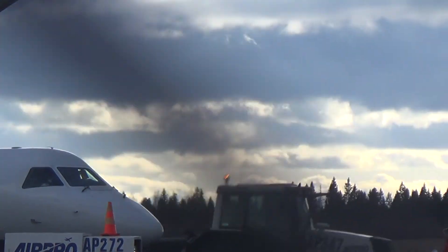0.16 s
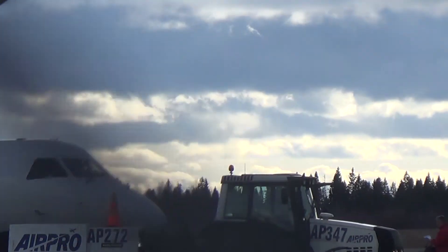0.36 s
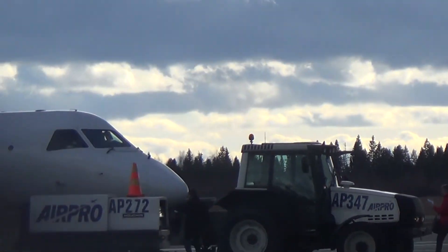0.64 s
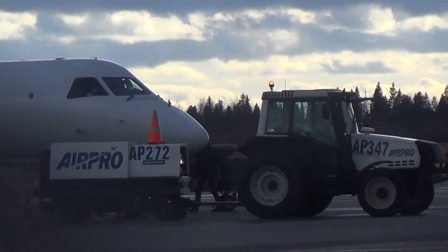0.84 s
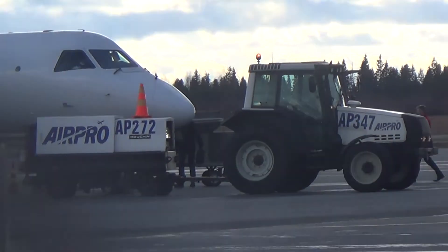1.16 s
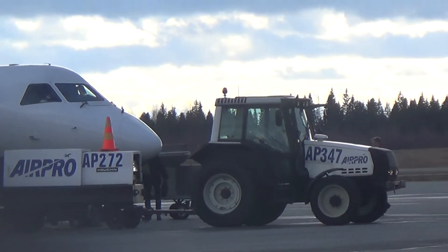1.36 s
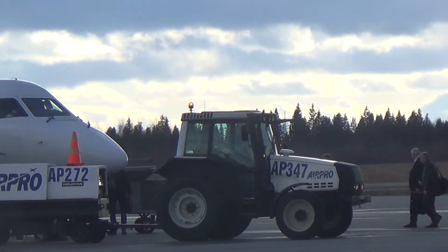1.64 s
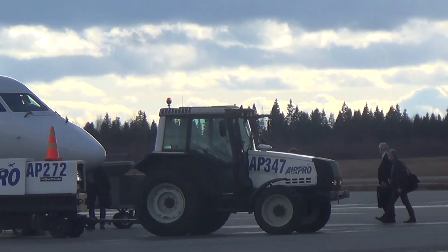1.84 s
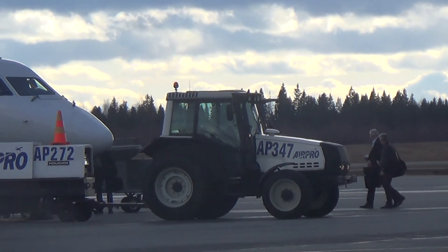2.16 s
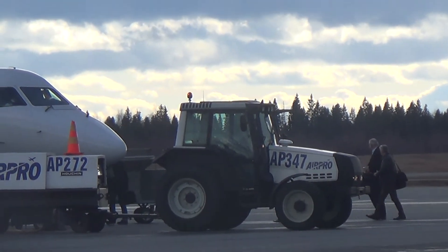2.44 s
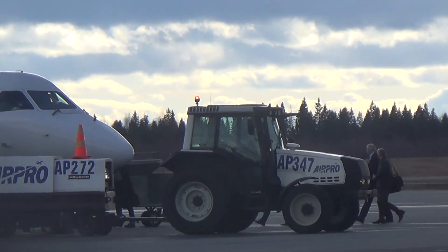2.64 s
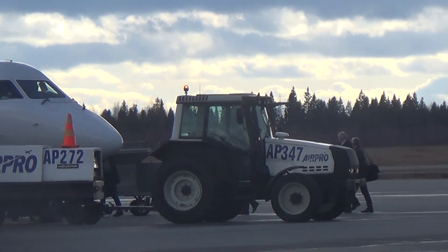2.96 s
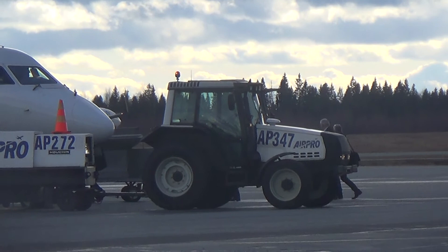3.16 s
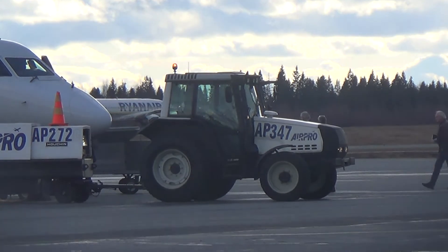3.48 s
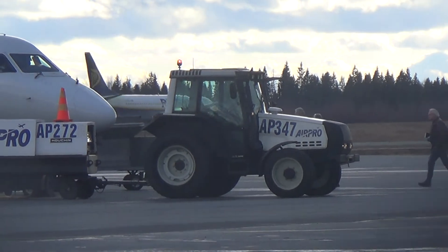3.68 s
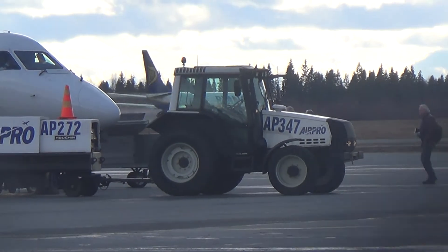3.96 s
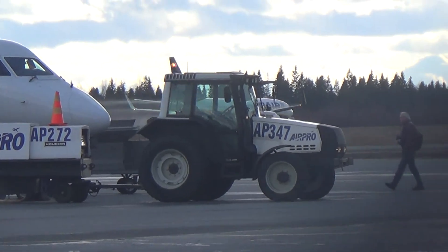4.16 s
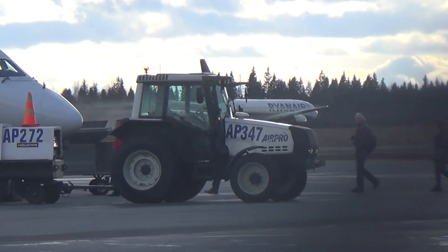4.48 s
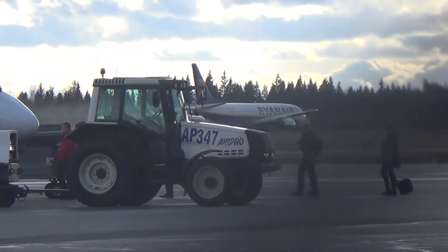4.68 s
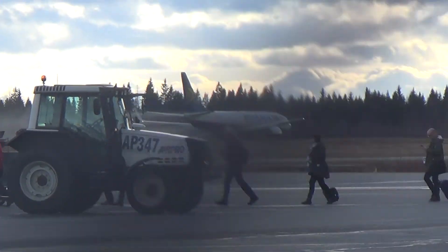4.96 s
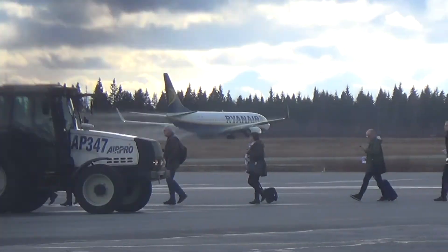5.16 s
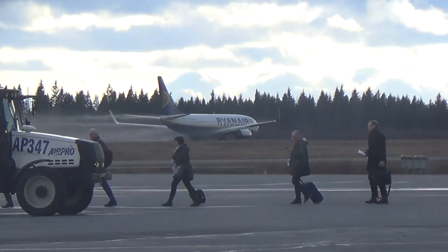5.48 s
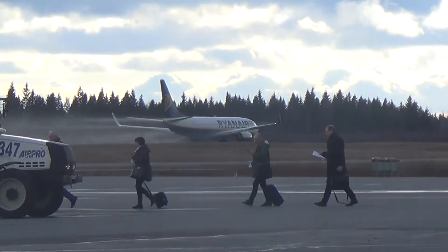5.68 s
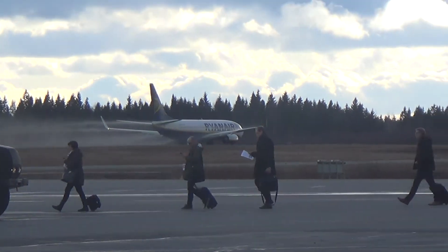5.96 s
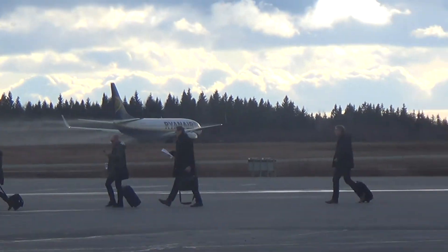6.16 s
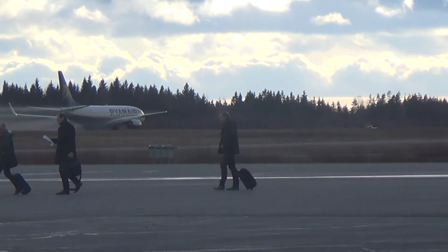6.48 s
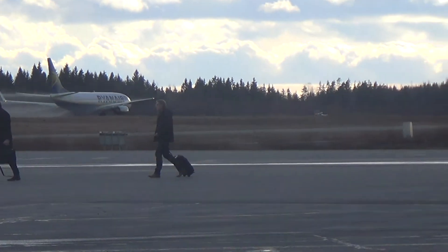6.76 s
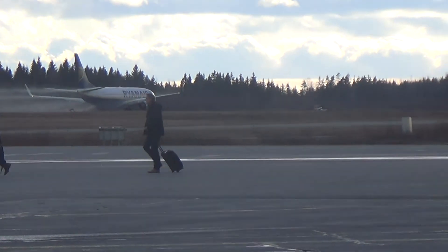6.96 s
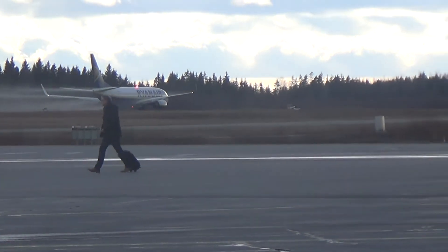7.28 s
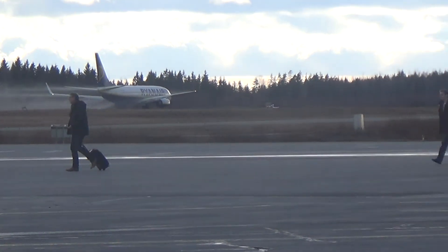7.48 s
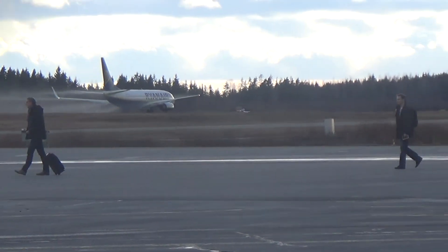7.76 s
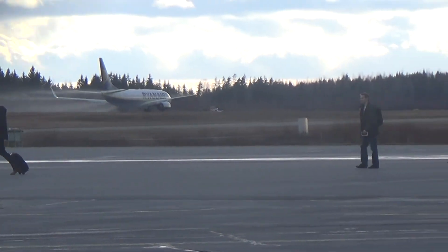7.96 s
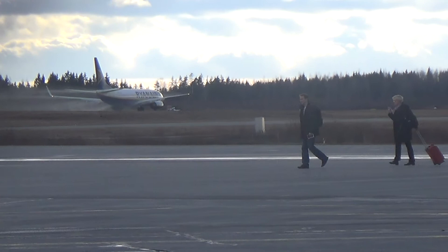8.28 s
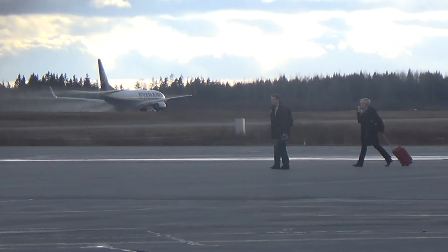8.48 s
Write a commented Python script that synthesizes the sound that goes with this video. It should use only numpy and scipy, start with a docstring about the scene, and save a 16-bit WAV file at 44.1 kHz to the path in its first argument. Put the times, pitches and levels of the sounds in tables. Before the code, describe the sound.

Outdoors on a windy airport apron, heard through a handheld camera's stereo microphone. From 0 s, strong low wind buffeting, slightly heavier on the right, covers a steady, mid-heavy distant jet roar with thin, wavering turbine whines. Small clicks fall at 0.4 and 0.7 s; faint airy high notes pass around 0.7 and 1.0 s, and another swells near 2.3 s. Short fluttering gust thumps strike around 0.5 to 1.3 s and 2.6 s, then cluster from 4.3 to 6 s. Deep exhaust rumble grows by 4.2 s. Plastic ticks come at 4.1, 4.7 and 5.1 s, the loudest a sharp snap at 5.3 s. Low wind pops bump at 5.7 to 6.4 s. From about 6.9 s the wind eases, exposing the roar and rumble, with faint rustles, light ticks at 7.3 to 7.6 and 8.3 s, soft hiss and a very high faint electronic whistle until the end at 8.6 s.

```python
"""Windy airport apron

A jet far down the runway and turbines nearer by, taken with a hand-held camera's two-port microphone.
Roar, rumble and rush are shaped noise, the roar arriving both directly and off the concrete; whines
are drifting tones blurred by noise, and the airy high notes are narrow bands of noise.
Wind buffets the whole microphone, and eddies, puffs and pops differ between its ports.
The camera ticks as ringing shell modes, rustles as grainy noise, and adds its own hiss and whistle."""
import sys
import numpy as np
from scipy import signal
from scipy.fft import rfft, irfft, next_fast_len
from scipy.io import wavfile
from scipy.ndimage import uniform_filter1d

SR = 44100
rng = np.random.default_rng(int(sys.argv[2]) if len(sys.argv) > 2 else 0)


def file_out(sig):
    """Save sig as 16-bit WAV at sys.argv[1]."""
    # one column per channel
    cols = np.atleast_2d(sig).T
    # limit, then scale
    lim = np.clip(cols, -1, 1)
    pcm = np.round(lim * 32767).astype(np.int16)
    wavfile.write(sys.argv[1], SR, pcm)


N = 380141
TIME = np.arange(N) / SR

# Every *_SPECTRUM table gives relative density: f/Hz, level/dB per Hz

# wind pressure on the whole microphone: t/s, level/dB, upper rumble relative to it/dB
BUFFET_CURVE = [(0, -14, -2), (.2, -14.5, 2.5), (.55, -15.5, -3), (.88, -15, -6), (1.25, -17, -6.5),
                (1.45, -17.5, -0.5), (1.7, -17, -1.5), (1.87, -17, 1), (2.1, -19, -15), (2.65, -15, -16),
                (3.2, -17, -11.5), (3.7, -15, -6.5), (4.2, -17, -5.5), (4.52, -15.5, -11.5),
                (4.85, -17.5, -5.5), (5.3, -18, -8), (5.7, -18.5, -10.5), (6.1, -21, -15), (6.3, -20, -9),
                (6.7, -22, -4), (6.95, -27, -7.5), (7.5, -28.5, 0), (8.1, -25.5, -7), (8.62, -27, -10)]
BUFFET_SPECTRUM = [(10, -41), (25, -28), (42, -21), (65, -3.5), (88, 0.6), (125, -3.5), (175, -8.5),
                   (235, -16.5), (310, -32.5), (450, -48.5), (1000, -44), (3000, -110)]
# brief lulls in the wind: centre t/s, length/s, depth/dB
WIND_LULLS = [(1.982, 0.057, 6), (4.68, 0.051, 8), (5.033, .04, 0), (5.483, 0.055, 7.5), (5.69, 0.046, 4.5),
              (6.846, 0.051, 1.5), (7.48, .04, 1)]
# turbulence at the ports, before an overall trim: t/s, level/dB
EDDY_CURVE = [(0, -27), (.75, -28), (1.15, -20.5), (1.95, -28), (2.65, -22), (3.1, -23.5), (4.1, -30),
              (4.35, -21.5), (4.7, -27), (5.25, -18.5), (5.65, -23.5), (5.95, -26), (6.65, -26.5),
              (7.15, -36.5), (7.8, -29.5), (8.62, -36)]
# the same turbulence in a moderate gust
EDDY_SPECTRUM = [(15, -31), (50, -19), (100, -3.5), (160, 1), (230, -2.5), (320, -18.5), (450, -20.5),
                 (700, -41), (1500, -60), (4000, -101)]
# engine roar, before an overall trim: t/s, level/dB, treble relative to it/dB, middle relative to it/dB
ROAR_CURVE = [(0, -32.5, -18, -1), (.45, -33, -18, -0.18), (1.4, -32, -19, .5), (2.45, -31.5, -17, 1.3),
              (3.2, -31, -19.5, .3), (3.8, -30, -22.5, -0.44), (4.3, -32, -20.5, -0.55),
              (4.9, -33, -20.5, -0.12), (5.6, -34, -23, -0.23), (6.3, -32, -24, -1.7),
              (7.3, -32.5, -21, -1.1), (7.85, -31.5, -19.5, -0.89), (8.62, -32, -20, 0.43)]
ROAR_SPECTRUM = [(30, -12.5), (150, 6.5), (320, 2.5), (420, -2.5), (520, -1.5), (610, 0.7), (850, -1.1),
                 (1020, -4.5), (1480, -4.5), (1760, -8.5), (2000, -10.5), (2350, -15), (2780, -14.5),
                 (3100, -20.5), (3800, -25), (4300, -30.5), (6500, -43), (15000, -93)]
# how the scattered roar differs from the jet's own spectrum: f/Hz, level/dB
SCATTER_TINT = [(300, -2.0), (650, -3.5), (1100, -0.5), (2800, -4.5), (6000, -0.5), (9000, -6), (12000, -22)]
# deep exhaust noise, stronger as the jet turns its tail this way: t/s, level/dB
RUMBLE_CURVE = [(0, -43), (1, -35), (2.5, -39), (4.2, -24), (5.5, -32.5), (6.85, -29.5), (7.5, -29),
                (7.95, -27.5), (8.62, -29.5)]
RUMBLE_SPECTRUM = [(10, -32), (24, 3), (40, 10), (62, 9.5), (85, 3.5), (140, -14), (400, -55), (1500, -110)]
# thin rush of air through the turbines: t/s, level/dB
RUSH_CURVE = [(0, -58), (.25, -66), (.6, -60.5), (1.1, -60.5), (1.7, -64), (2.2, -59), (2.7, -59.5),
              (3.3, -64), (4.4, -66), (5.6, -70), (6.5, -63.5), (7.5, -65), (8.62, -62)]
RUSH_SPECTRUM = [(2500, -5), (4200, -.5), (5300, 1.5), (6300, -2), (8000, -0.5), (10000, -2.5),
                 (11500, -8.5), (15000, -23)]
# steady turbine and fan tones: f/Hz, level at the start/dB, blur/Hz, fading/dB per s
BLADE_TONES = [(319.7, -56.5, 8, -1), (566, -60, 50, -2), (598.3, -51, 14, -0.94), (1120, -57, 18, -0.5),
               (1232, -59, 8, -0.3), (1373, -53, 9, 0.5), (1519, -65, 4.4, 2.5), (3520, -66.5, 11, 0.6),
               (3920, -71, 39, 0), (5594, -77.5, 16, 0)]
# two tones that come and go on the wind: t/s, f/Hz, level/dB
FAN_WHINE_CURVE = [(0, 2756, -63), (.5, 2770, -66), (1.0, 2750, -58), (1.7, 2780, -59), (2.5, 2740, -59),
                   (3.4, 2738, -60), (4.5, 2766, -55), (5.6, 2760, -64), (6.5, 2756, -61),
                   (8.62, 2780, -61)]
BRIEF_WHINE_CURVE = [(0, 3472, -63), (.2, 3460, -58), (.38, 3480, -65), (1.2, 3465, -68), (2.6, 3465, -75),
                     (4, 3465, -88)]
# airy turbine notes, two short high ones, the second lower, and one swelling: t/s, f/Hz, level/dB
HIGH_NOTES_CURVE = [(0, 10400, -89), (.45, 10350, -79), (.68, 10280, -71), (.86, 10100, -80),
                    (.93, 8900, -84), (1.04, 8680, -71), (1.25, 8550, -80), (1.8, 8300, -100)]
SWELLING_CURVE = [(0, 5200, -84), (1.6, 5200, -75), (2.3, 5250, -65), (2.7, 5250, -69.5), (3.4, 5230, -75),
                  (5, 5100, -95)]
# the camera's own noise: t/s, hiss level/dB, whistle level before a trim/dB
CAMERA_NOISE = [(0, -64, -77), (1.2, -61.5, -76), (2.2, -61, -73), (4, -60.5, -74), (5.6, -61.5, -73),
                (6.8, -59.5, -71), (8.62, -60, -70.5)]
HISS_SPECTRUM = [(1000, -3.5), (6000, 2), (9800, 1), (12000, -1.5), (13500, -1.5), (15700, -3)]
# ticks of the camera body: t/s, peak of the shell's ring/dB, tilt/dB per octave, f of the spot pressed/Hz
BODY_TICKS = [(0.397, -38, -1, 4800), (.6674, -41, 0, 10500), (4.067, -36, -8, 4750),
              (4.6868, -32, -11, 3900), (5.103, -39, 12, 8700), (5.105, -26, 13, 4560),
              (5.3331, -15, -2, 2560), (5.4053, -30.5, 6, 4750), (7.3108, -37, -4, 5050),
              (7.525, -43, 12, 10000), (7.5674, -37, -14, 2500), (8.3126, -38, 10, 11500)]
# modes of the small plastic shell, before a tick's tilt: f/Hz, level/dB, t60/s
SHELL_MODES = [(2100, -3, 0.012), (2720, -2, 0.014), (3380, 1.5, 0.015), (4650, 0, 0.011), (5330, -7, .008),
               (5910, -1.5, .013), (6300, -14, 0.025), (7400, -10, 0.013), (8700, -6, 0.014),
               (9180, -4, 0.012), (10300, -7, 0.007), (11400, -7, .008), (12900, -12, .007)]
# gusts that strike the case: start t/s, length/s, level/dB, centre f/Hz, part common to both ports/dB
CASE_PUFFS = [(0.505, 0.04, -23, 240, -10), (0.954, 0.089, -27.5, 230, -12), (1.125, 0.064, -35, 269, -4),
              (1.256, 0.04, -19, 262, -10), (2.584, 0.042, -20, 278, -11), (4.299, 0.12, -21, 220, -11),
              (4.539, 0.054, -16, 220, -13), (4.796, 0.035, -15, 200, -11), (5.056, 0.092, -20, 271, -2),
              (5.22, 0.097, -21, 215, -2.5), (5.335, 0.064, -22.5, 240, -4), (5.412, 0.069, -19, 205, 1),
              (5.495, 0.093, -25.5, 235, -2), (5.782, 0.05, -25.5, 230, -6),
              (5.873, 0.11, -21.5, 280, -3.5), (5.995, 0.0325, -24, 288, -4), (7.335, .04, -32, 200, -12),
              (8.154, .04, -31, 200, -8)]
# fingers shifting on the shell: centre t/s, length/s, level/dB
FINGER_RUBS = [(3.40, .025, -57), (6.47, .025, -60), (7.427, .015, -60), (7.497, 0.046, -56),
               (7.66, .028, -57), (8.0, 0.09, -60), (8.13, .028, -54), (8.533, .012, -49.5),
               (8.555, .012, -57)]
RUB_SPECTRUM = [(1500, -30), (5000, 0), (8000, -4), (10300, -2), (12500, -7), (15000, -20)]
# single whirls between the ports: centre t/s, peak of the opposed part/dB
WHIRL_POPS = [(5.722, -19), (5.779, -12), (6.179, -15), (6.25, -17), (6.351, -8.5)]


def gain_of(db):
    """Decibels to amplitude."""
    return 10 ** (np.asarray(db) / 20)


def evened(x):
    """Scales to rms 1."""
    return x / np.sqrt(np.mean(x ** 2) + 1e-20)


def steadied(x, seconds):
    """Evens out swells slower than the given time."""
    span = max(int(seconds * SR), 8)
    power = uniform_filter1d(uniform_filter1d(x ** 2, span), span)
    return x / np.sqrt(abs(power) + 1e-9)


def spectrum_at(points, hz):
    """A spectrum in dB, straight on a log-frequency axis."""
    f, db = np.transpose(points)
    return np.interp(np.log(hz + 1), np.log(f + 1), db)


def follow(rows, t, axis=1):
    """One column of a curve at the times t."""
    rows = np.asarray(rows)
    return np.interp(t, rows[:, 0], rows[:, axis])


def add(mix, s, sound):
    """Lays a sound into the mix at time s, cut off at the end of the mix."""
    part = mix[round(s * SR):][:len(sound)]
    part += sound[:len(part)]


def stereo(middle, side):
    """Left and right from a common part and an opposed part."""
    return np.array([middle + side, middle - side])


def lean_right(db):
    """Gains that lower the left and raise the right by the same number of dB."""
    return gain_of([[-db], [db]])


def steady_noise(spectrum):
    """Noise of rms 1 with a fixed spectrum."""
    size = next_fast_len(N, real=True)
    hz = np.fft.rfftfreq(size, 1 / SR)
    white = rfft(rng.standard_normal(size))
    return evened(irfft(white * gain_of(spectrum_at(spectrum, hz)), size)[:N])


def changing_noise(colour, size=2048):
    """Noise of rms 1 whose spectrum colour(t, hz), in dB, may change while its expected power stays even."""
    hop = size // 4
    t = np.arange(N // hop + 5)[:, None] * hop / SR
    hz = np.fft.rfftfreq(size, 1 / SR)
    shape = gain_of(colour(t, hz)) * np.ones_like(t)
    shape /= np.linalg.norm(shape, axis=1, keepdims=True)
    frames = shape * (rng.standard_normal(shape.shape) + 1j * rng.standard_normal(shape.shape))
    return evened(signal.istft(frames.T, nperseg=size, noverlap=size - hop)[1][:N])


def wander(rate):
    """A random drift of rms 1 that takes a new value so many times a second."""
    knots = np.arange(0, TIME[-1] + 1, 1 / rate)
    return evened(np.interp(TIME, knots, rng.standard_normal(8192)[:len(knots)]))


def surging(per_s, depth_db):
    """Random rise and fall of the wind about its mean strength, in dB."""
    return depth_db * wander(per_s)


def lulls():
    """How far the wind has dropped in its brief lulls, in dB."""
    return sum(depth * np.exp(-((TIME - s) / length) ** 2) for s, length, depth in WIND_LULLS)


def blurred_tone(turn, blur_hz, direct):
    """A tone of rms 1: a steady core plus random in-phase and quadrature parts that widen its line."""
    return evened((direct + wander(blur_hz)) * np.cos(turn) + wander(blur_hz) * np.sin(turn))


def buffet(lean_db=1.3, side_db=-12, neutral_db=-7.0, tilt_share=0.81):
    """Large whirls press on both ports at once, harder on the windward right, with surges and brief lulls."""
    def colour(t, hz):
        upper = np.interp(hz, [110, 180], [0, 1])
        tilt_db = tilt_share * (follow(BUFFET_CURVE, t, axis=2) - neutral_db)
        return spectrum_at(BUFFET_SPECTRUM, hz) + upper * tilt_db
    common = steadied(changing_noise(colour), 0.12)
    opposed = gain_of(side_db) * steady_noise(BUFFET_SPECTRUM)
    strength_db = follow(BUFFET_CURVE, TIME) + surging(12, 0.85) - lulls()
    return stereo(common, opposed) * gain_of(strength_db) * lean_right(lean_db)


def eddies(trim_db=-2.4, common_db=-5, moderate_db=-26, db_per_octave=19, flutter_db=2.0, lull_share=0.34):
    """Small whirls differ from port to port; a faster gust is both louder and higher."""
    def colour(t, hz):
        over_db = np.maximum(follow(EDDY_CURVE, t) - moderate_db, -3)
        speed = 2 ** (over_db / db_per_octave)
        return spectrum_at(EDDY_SPECTRUM, hz / speed)
    flutter = evened(gain_of(flutter_db * wander(70)))
    common = gain_of(common_db) * changing_noise(colour)
    opposed = steadied(changing_noise(colour), 0.051)
    strength_db = follow(EDDY_CURVE, TIME) + surging(12, 1.4) - lull_share * lulls()
    return stereo(common, opposed) * flutter * gain_of(strength_db + trim_db)


def roar(trim_db=2.0, echo_s=0.001463, echo=0.19, echo_dull_hz=3600, scattered_db=-9.0, neutral_db=-21):
    """Jet mixing noise, combed by its duller reflection off the concrete, amid scattered sound."""
    def colour(t, hz):
        treble = np.interp(hz, [2000, 3400], [0, 1])
        middle = np.interp(hz, [750, 1200, 1600, 2500], [0, 1, 1, 0])
        treble_db = treble * (follow(ROAR_CURVE, t, axis=2) - neutral_db)
        middle_db = middle * follow(ROAR_CURVE, t, axis=3)
        return spectrum_at(ROAR_SPECTRUM, hz) + treble_db + middle_db

    def scattered_colour(t, hz):
        return colour(t, hz) + spectrum_at(SCATTER_TINT, hz)
    jet = changing_noise(colour)
    reflected = signal.filtfilt(*signal.butter(3, echo_dull_hz, fs=SR), jet)
    both_paths = evened(jet + echo * np.interp(TIME - echo_s, TIME, reflected))
    scattered = gain_of(scattered_db) * changing_noise(scattered_colour)
    return stereo(both_paths, scattered) * gain_of(follow(ROAR_CURVE, TIME) + trim_db)


def rumble(side_db=-11, lean_db=2.0):
    """The lowest exhaust noise carries far across the field, stronger on the right."""
    common = steadied(steady_noise(RUMBLE_SPECTRUM), 0.11)
    opposed = gain_of(side_db) * steady_noise(RUMBLE_SPECTRUM)
    return stereo(common, opposed) * gain_of(follow(RUMBLE_CURVE, TIME)) * lean_right(lean_db)


def rush(side_db=-8, narrowing_db=-22, shimmer_db=1.3):
    """High turbine hiss, shimmering as the wind carries it; nearly mono at the top."""
    side_spectrum = [(hz, db + narrowing_db * np.interp(hz, [6000, 11000], [0, 1]))
                     for hz, db in RUSH_SPECTRUM]
    common = steady_noise(RUSH_SPECTRUM)
    opposed = gain_of(side_db) * steady_noise(side_spectrum)
    level_db = follow(RUSH_CURVE, TIME) + shimmer_db * wander(35)
    return stereo(common, opposed) * gain_of(level_db)


def whines(direct=0.68, drift=0.00149):
    """Blade tones: a steady core that drifts with the shaft, blurred by the gusty air it crosses."""
    out = np.zeros(N)
    shaft_time = np.cumsum(1 + drift * wander(4)) / SR  # one drift shared by all tones
    for hz, db, blur_hz, fading in BLADE_TONES:
        tone = blurred_tone(2 * np.pi * hz * shaft_time, blur_hz, direct)
        out += gain_of(db - fading * TIME) * tone
    return out


def passing_whine(curve, blur_hz=16, direct=1.1):
    """A blade tone that the wind brings and takes away again."""
    turn = 2 * np.pi * np.cumsum(follow(curve, TIME)) / SR
    return blurred_tone(turn, blur_hz, direct) * gain_of(follow(curve, TIME, axis=2))


def airy_note(curve, width_hz=240, flicker_db=1.6):
    """A narrow band of turbine noise that flickers as it follows its curve."""
    def colour(t, hz):
        return -20 * np.log10(1 + ((hz - follow(curve, t)) / width_hz) ** 2)
    level_db = follow(curve, TIME, axis=2) + flicker_db * wander(18)
    return changing_noise(colour) * gain_of(level_db)


def electronics(side_db=-28, whistle_trim_db=5.0, blank_share=.24, line_hz=15625, field_hz=50):
    """Preamplifier hiss, and the line whistle that dips once in every picture field."""
    hiss = stereo(steady_noise(HISS_SPECTRUM), gain_of(side_db) * steady_noise(HISS_SPECTRUM))
    field = (TIME * field_hz) % 1 - .5
    scanning = 1 - np.exp(-(2 * field / blank_share) ** 4)
    whistle = evened(scanning * np.sin(2 * np.pi * line_hz * TIME))
    whistle_db = follow(CAMERA_NOISE, TIME, axis=2) + whistle_trim_db
    return hiss * gain_of(follow(CAMERA_NOISE, TIME)) + whistle * gain_of(whistle_db)


def ticks(crack_db=-3, crack_s=0.0016, side_db=-5, tilt_per_octave=20, spot_db=-11, spot_t60=0.015):
    """Each tick is a brief crack, a ringing shell and the spot pressed; sharper ones favour the high modes."""
    out, t = np.zeros((2, N)), np.arange(SR // 25) / SR
    hz, db, t60 = np.transpose(SHELL_MODES)[:, :, None]
    octaves = np.log2(hz / hz.mean())
    signs = (-1) ** np.arange(len(SHELL_MODES))[:, None]
    softening = signal.butter(4, 14000, fs=SR)

    def snap(band):
        burst = rng.standard_normal(len(t)) * np.exp(-t / crack_s)
        return evened(signal.lfilter(*band, burst))

    for s, peak_db, tilt, spot_hz in BODY_TICKS:
        crack_hz = np.array([2100, 8500]) * 2 ** (tilt / tilt_per_octave)
        crack_band = signal.butter(4, np.minimum(crack_hz, [7000, 11800]), "bandpass", fs=SR)
        modes = gain_of(db + tilt * octaves - 60 * t / t60) * np.sin(2 * np.pi * hz * t)
        ring = (signs * modes).sum(0)
        # the low modes bend the shell differently at the two ports
        low_modes = modes * 2 / (1 + (hz / hz.mean()) ** 4)
        bend = (rng.permutation(signs) * low_modes).sum(0)
        crack = gain_of(crack_db) * ring.std()
        peak = abs(ring).max()
        spot = peak * gain_of(spot_db - 60 * t / spot_t60) * np.sin(2 * np.pi * spot_hz * t)
        common = ring + crack * snap(crack_band) + spot
        opposed = gain_of(side_db) * (bend + crack * snap(crack_band))
        for port, tick in zip(out, signal.lfilter(*softening, stereo(common, opposed))):
            add(port, s, gain_of(peak_db) * tick / peak)
    return out


def puffs(spread=0.28, attack_s=0.017, release_s=0.046, sag_db=-5, grain_db=1.5, dulling_db_per_octave=30):
    """Each striking gust is a lumpy thump, brightest at its crest, that pushes one port and sucks the other."""
    out = np.zeros((2, N))
    size = SR // 2
    t, hz = np.arange(size) / SR, np.fft.rfftfreq(size, 1 / SR)

    def band_noise(band):
        return steadied(evened(irfft(band * rfft(rng.standard_normal(size)), size)), 0.033)

    for s, length, db, centre, common_db in CASE_PUFFS:
        band = np.exp(-.5 * (np.log((hz + 1) / centre) / spread) ** 2)
        both = stereo(gain_of(common_db) * band_noise(band), band_noise(band))
        corners = [0, attack_s, max(length, attack_s), length + release_s]
        envelope = np.interp(t, corners, [0, 1, gain_of(sag_db), 0])
        # a stronger push runs the whirl faster, raising its pitch
        speed = 2 ** (20 * np.log10(envelope + 0.192) / dulling_db_per_octave)
        whirl_time = np.cumsum(speed) / SR
        lumps = evened(gain_of(grain_db * wander(80)[:size]))
        for port, whirl in zip(out, both):
            add(port, s, gain_of(db) * envelope * lumps * np.interp(whirl_time, t, whirl))
    return out


def rubs(grain_db=4.5):
    """Skin sliding on plastic: short, grainy swishes."""
    swell = sum(gain_of(db) * np.exp(-2 * ((TIME - s) / length) ** 2) for s, length, db in FINGER_RUBS)
    grains = gain_of(grain_db * wander(500))
    return swell * evened(grains * steady_noise(RUB_SPECTRUM))


def pops(centre_hz=260, common_db=-14):
    """One small whirl crosses the ports: a single push and pull, mostly opposite at the two."""
    out = np.zeros(N)
    for s, peak_db in WHIRL_POPS:
        u = 2 * np.pi * centre_hz * (TIME - s)
        out += gain_of(peak_db) * u * np.exp(.5 * (1 - u ** 2))
    return stereo(gain_of(common_db) * out, out)


def scene():
    """Engines far off, wind and handling at the camera."""
    wind = buffet() + eddies() + puffs() + pops()
    tones = whines() + passing_whine(FAN_WHINE_CURVE) + passing_whine(BRIEF_WHINE_CURVE)
    airy_notes = airy_note(HIGH_NOTES_CURVE) + airy_note(SWELLING_CURVE)
    engines = roar() + rumble() + rush() + tones + airy_notes
    camera = electronics() + ticks() + rubs()
    return engines + wind + camera


def record(dry, edge_hz=15760):
    """A soft start and stop, then the camera's steep band limit."""
    ends = signal.windows.tukey(N, .001)
    lowpass = signal.firwin(2047, edge_hz, window=("kaiser", 9), fs=SR)
    return signal.oaconvolve(dry * ends, lowpass[None], "same", axes=1)


dry = scene()
out = record(dry)
file_out(out)
```